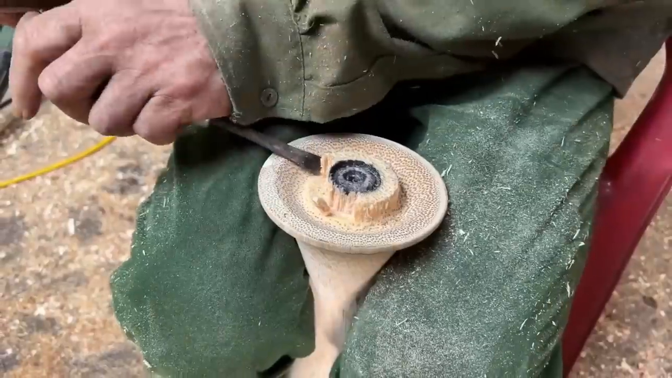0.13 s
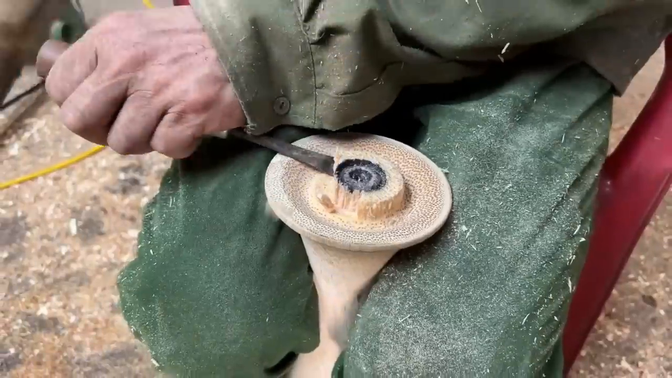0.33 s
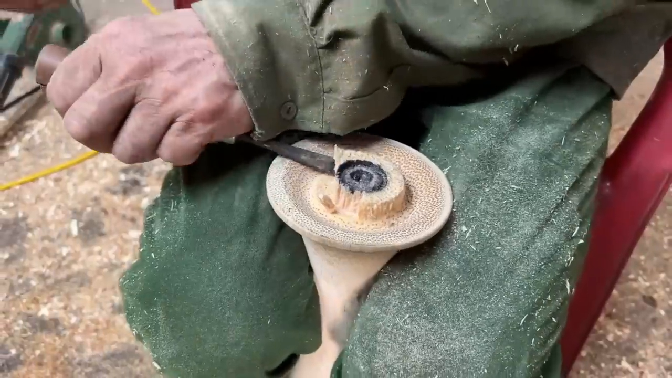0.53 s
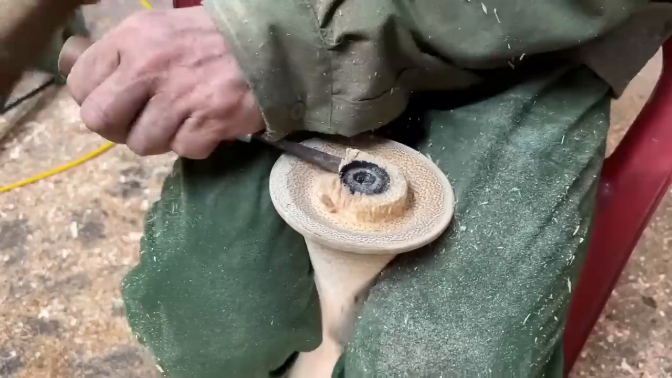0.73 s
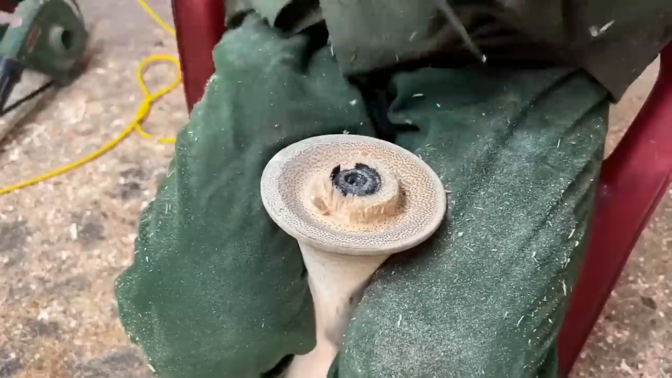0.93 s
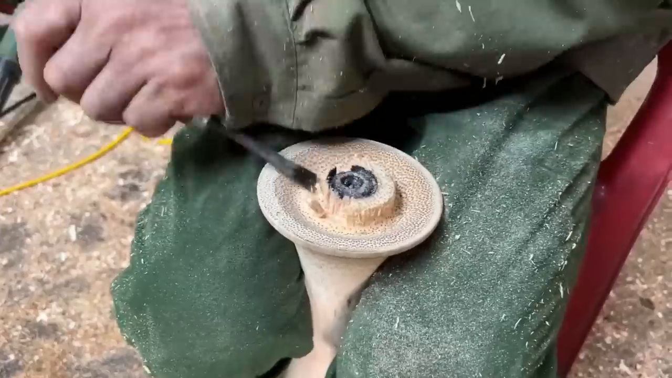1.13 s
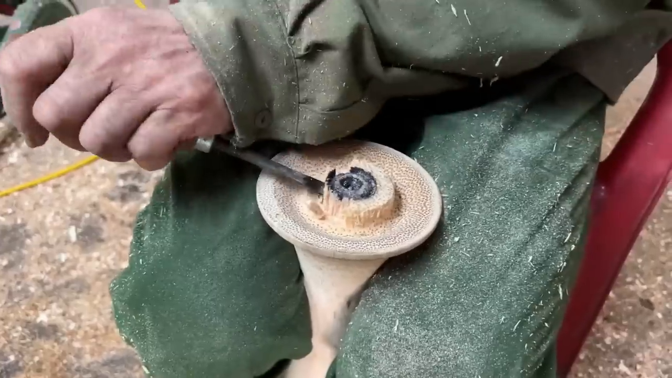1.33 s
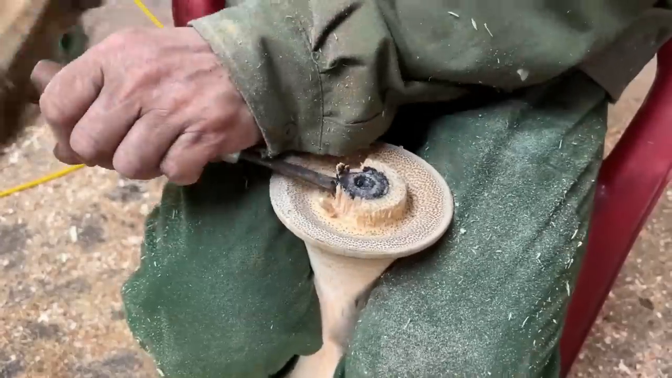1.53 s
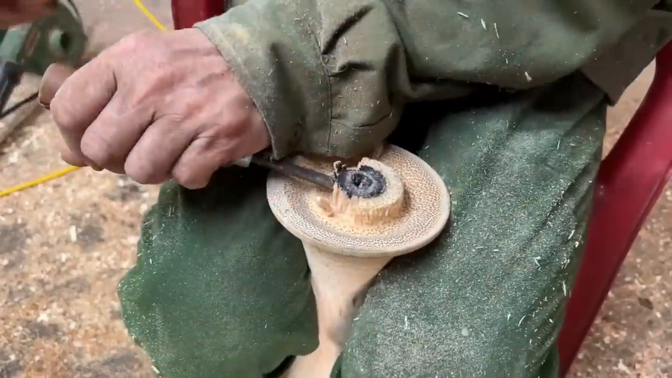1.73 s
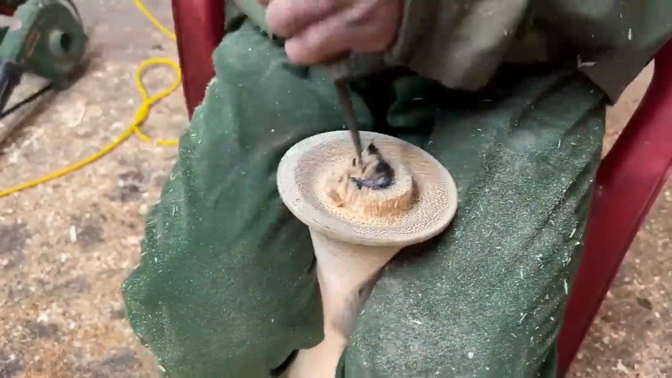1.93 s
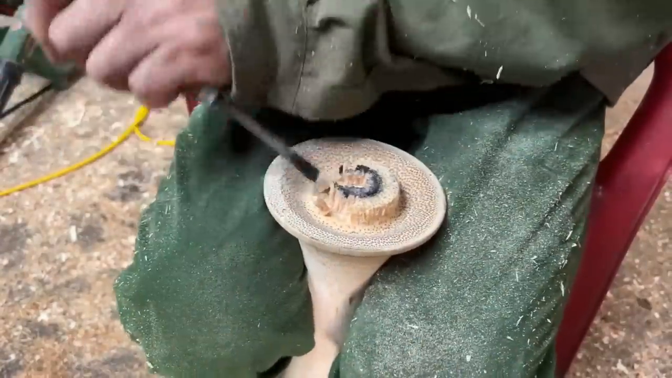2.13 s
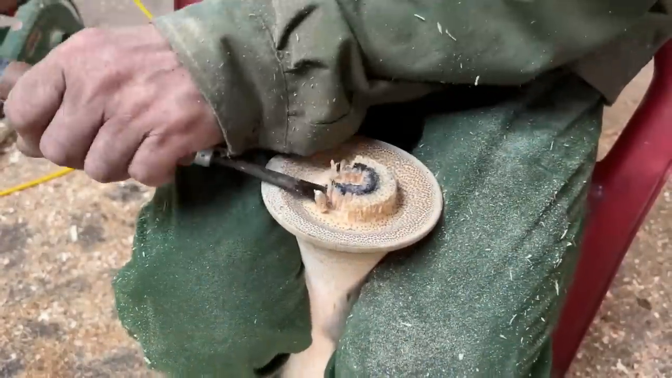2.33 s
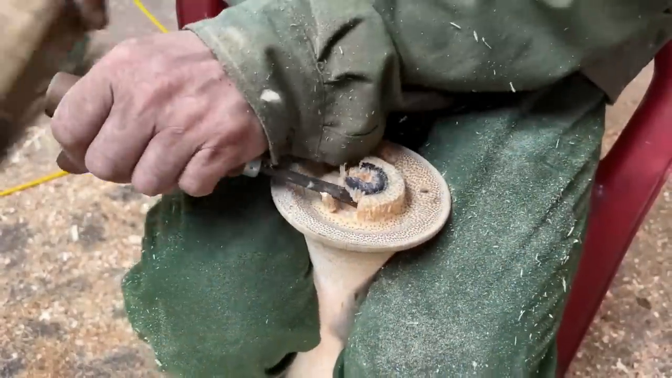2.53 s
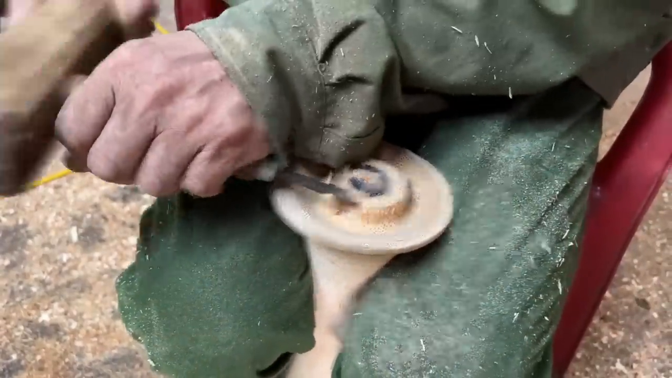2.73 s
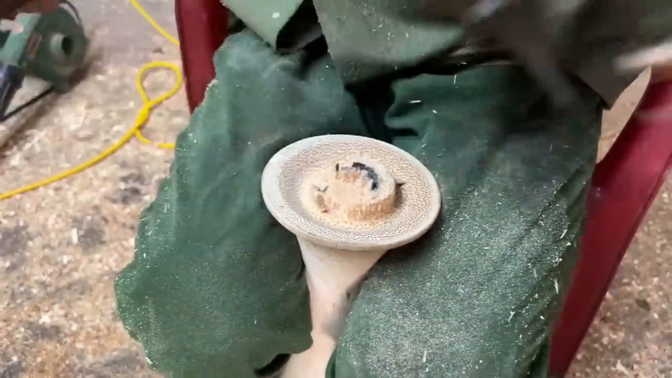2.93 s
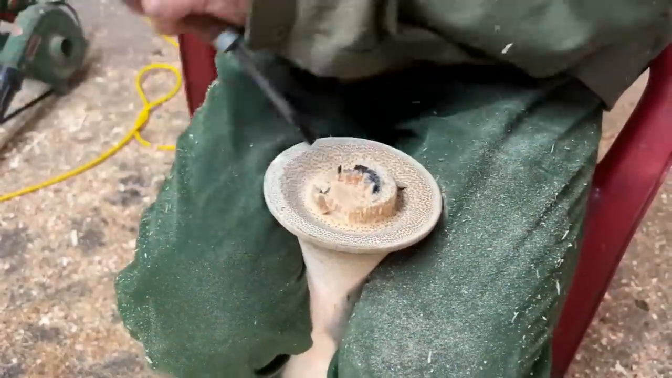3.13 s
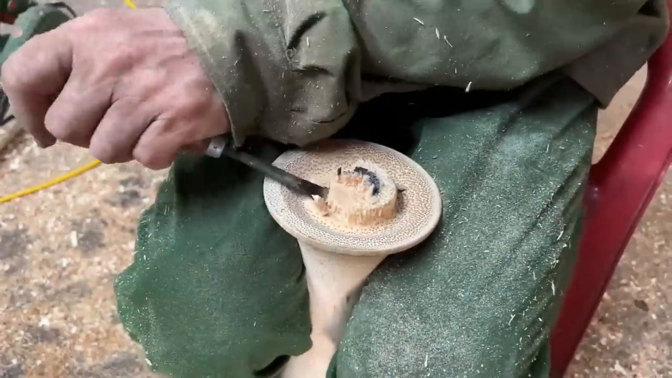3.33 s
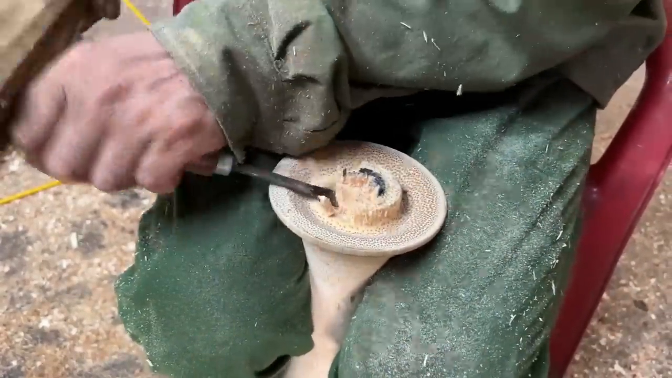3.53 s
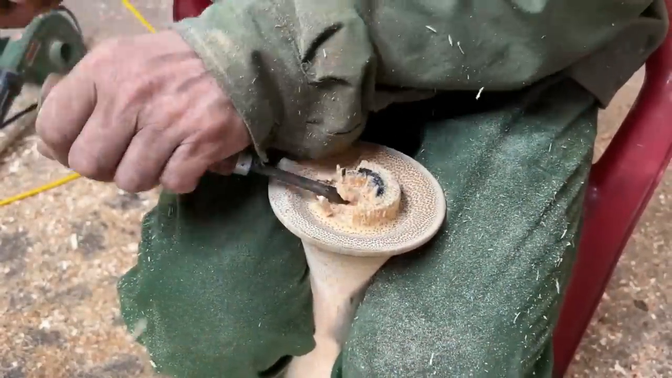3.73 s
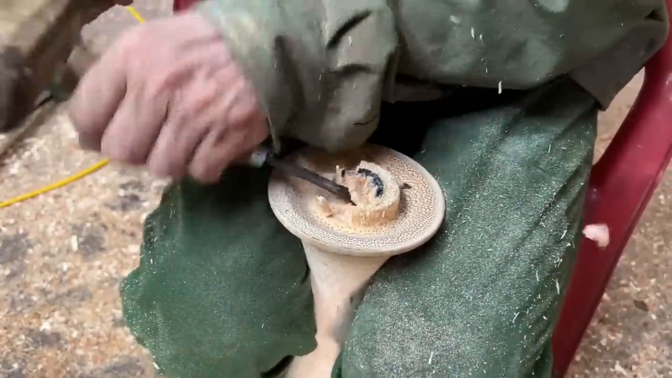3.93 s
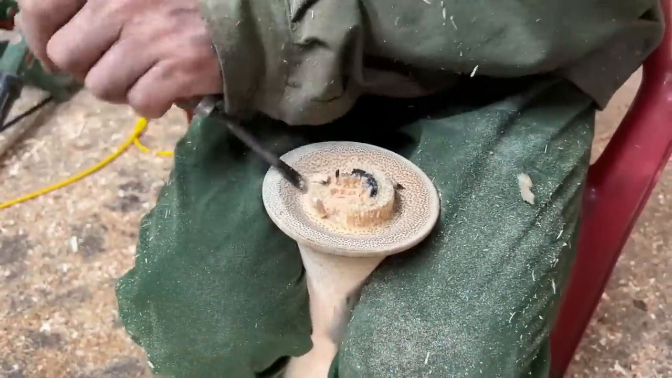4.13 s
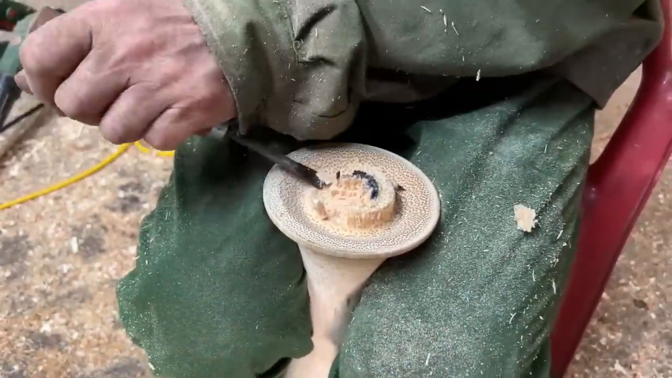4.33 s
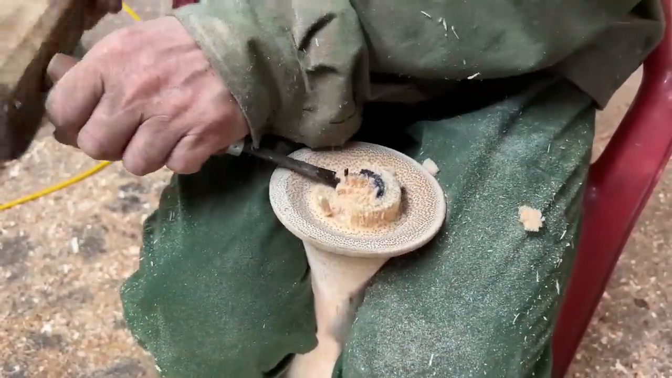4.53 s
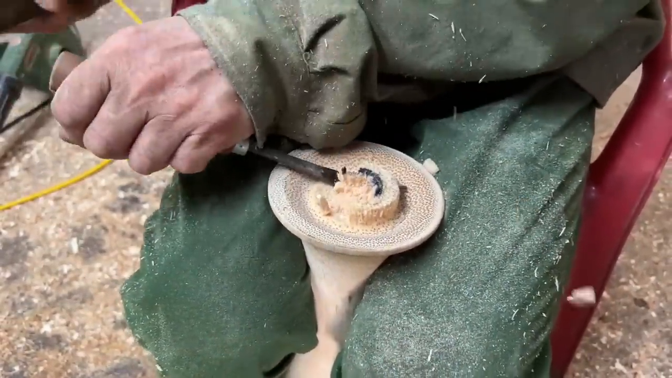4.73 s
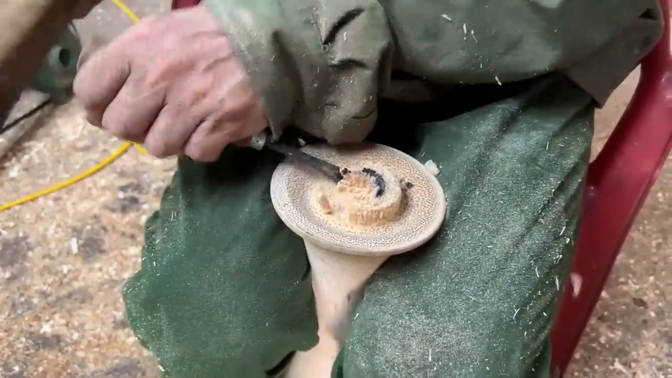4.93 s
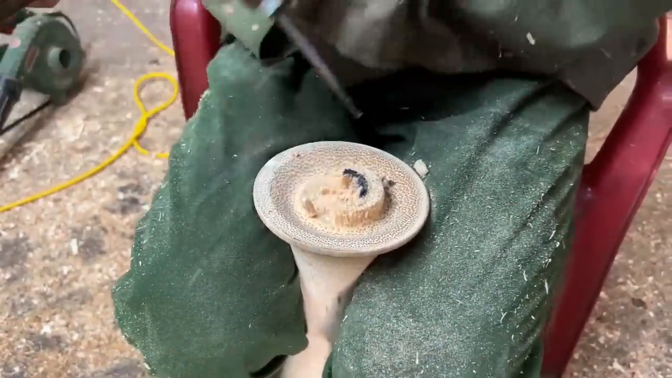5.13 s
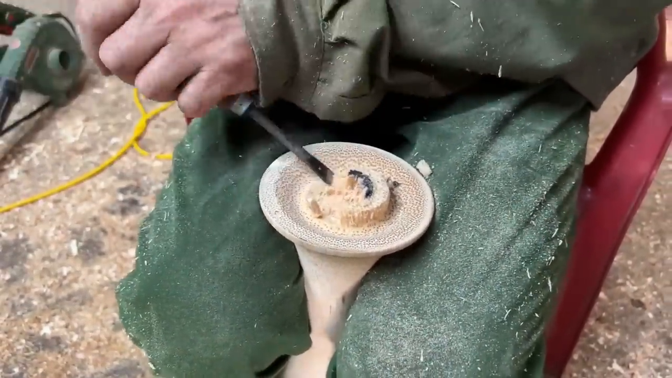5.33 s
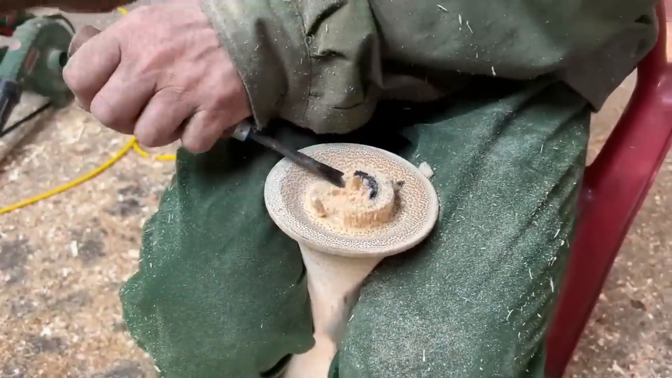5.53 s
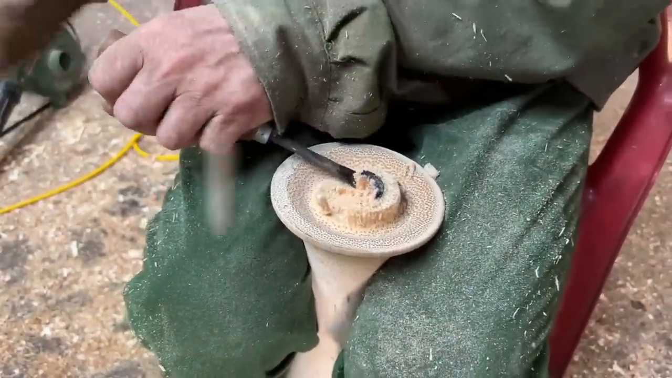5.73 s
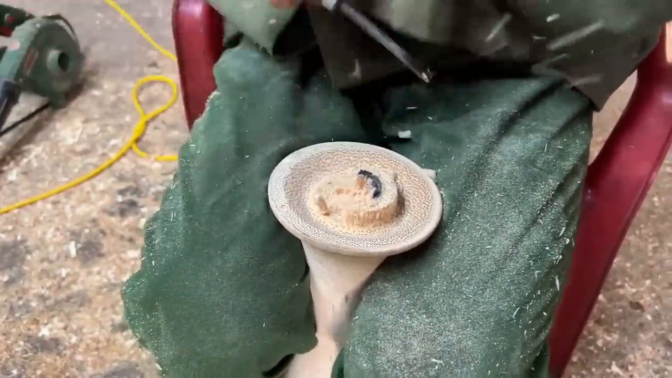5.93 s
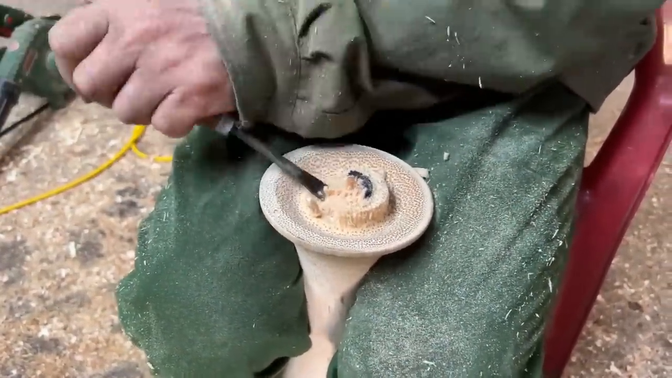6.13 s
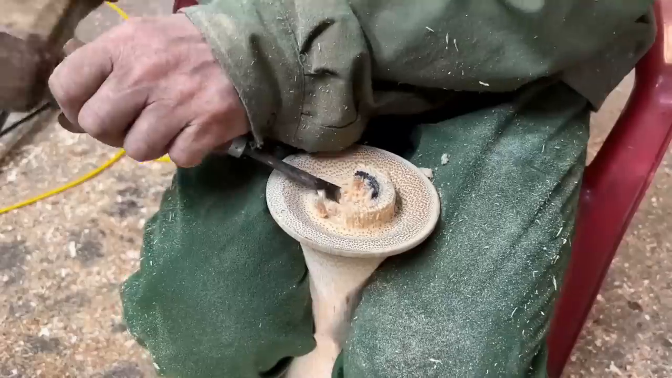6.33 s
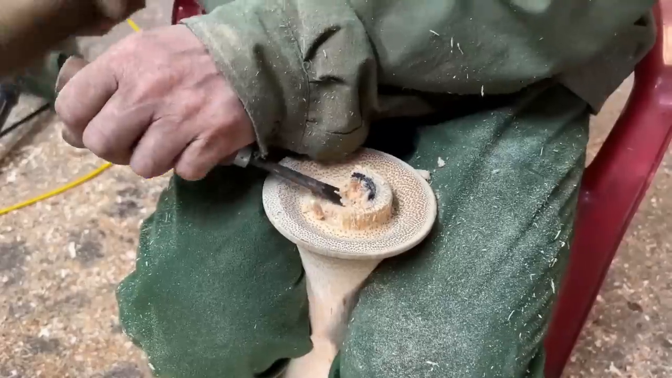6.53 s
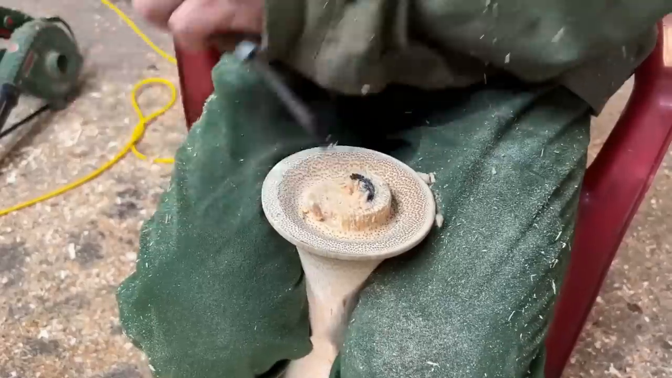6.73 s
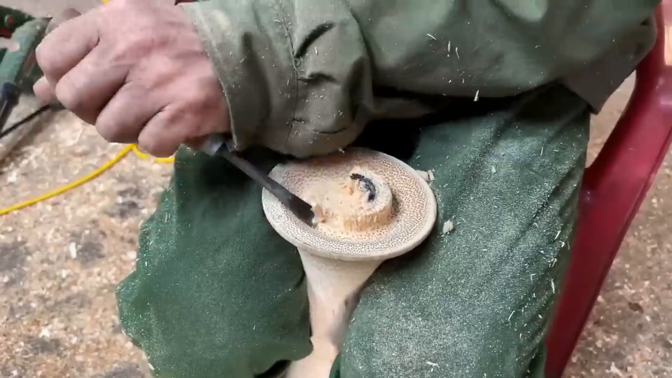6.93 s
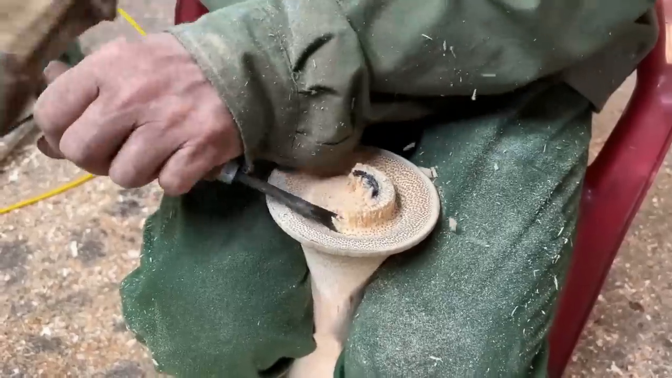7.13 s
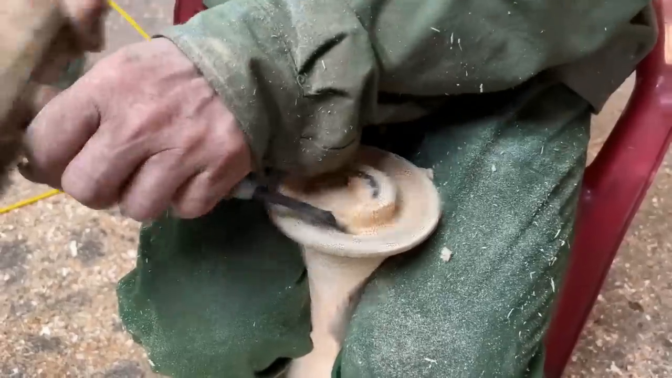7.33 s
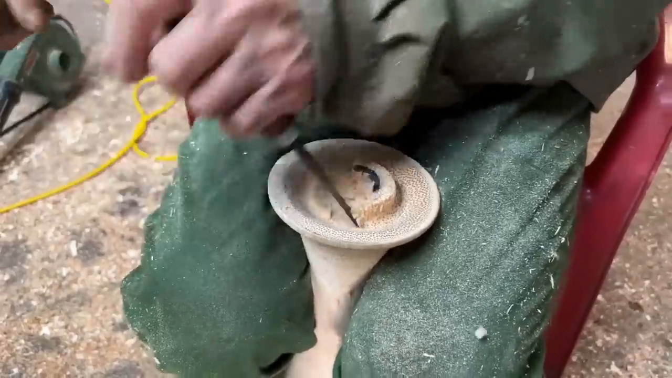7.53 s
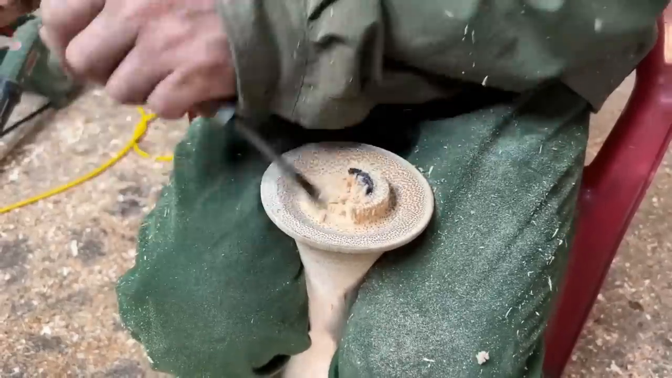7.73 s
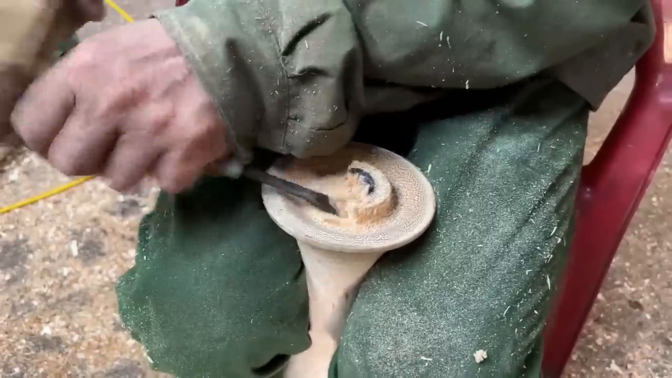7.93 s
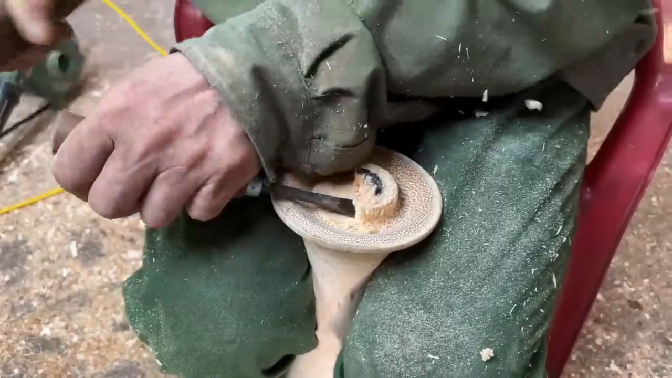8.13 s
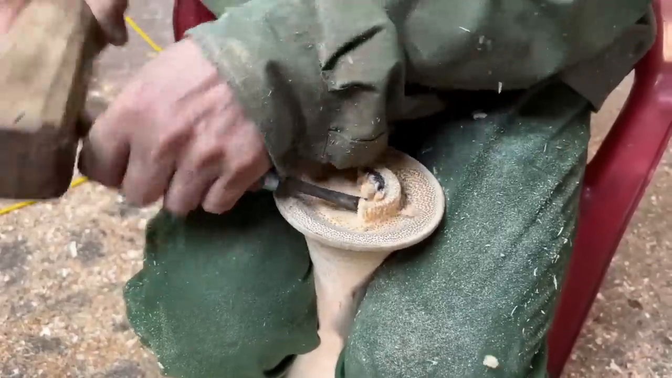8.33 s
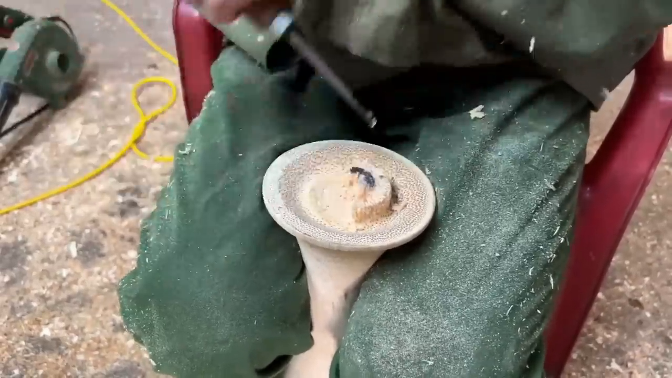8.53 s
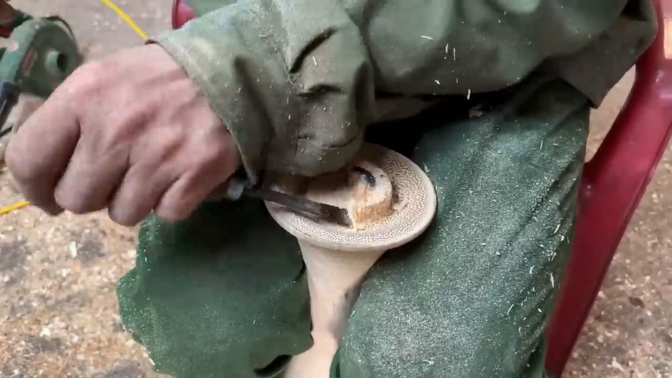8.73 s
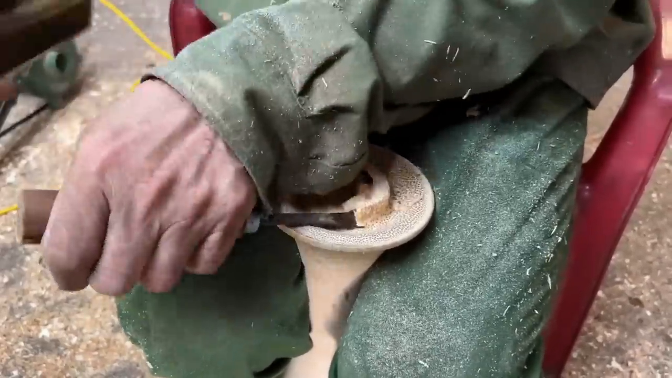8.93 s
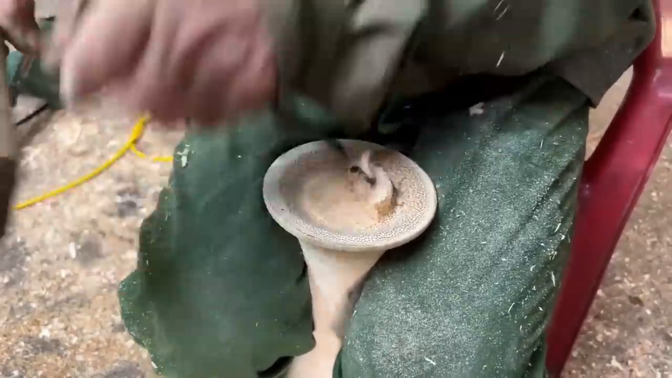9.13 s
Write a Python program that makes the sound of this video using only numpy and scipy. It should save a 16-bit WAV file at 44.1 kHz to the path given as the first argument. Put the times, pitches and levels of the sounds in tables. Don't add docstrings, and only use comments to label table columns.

```python
import sys
import numpy as np
from scipy import signal
from scipy.fft import irfft, next_fast_len
from scipy.io import wavfile
from scipy.ndimage import uniform_filter1d

SR = 44100
rng = np.random.default_rng(int(sys.argv[2]) if len(sys.argv) > 2 else 0)


def level_to_linear(level):
    exponent = np.asarray(level, float) / 20
    return 10 ** exponent


def wav_out(sig):
    wavfile.write(sys.argv[1], SR, np.round(np.clip(np.atleast_2d(sig).T, -1, 1) * 32767).astype(np.int16))


N = 409248

# freq_hz, level_db
AIR_SPECTRUM = [(15, -29), (25, -18), (92, -8.5), (158, -11.5), (228, -12.5), (288, -5), (328, -14),
                (437, -23), (485, -25), (538, -23.5), (1410, -25.5), (2250, -30), (5160, -41), (6190, -44),
                (12500, -53.5), (16200, -75.5), (22000, -120)]
# time_s, level_db
AIR_LEVEL = [(0.0, -55), (0.36, -52.5), (0.52, -58.5), (0.88, -56.5), (1.03, -63), (1.4, -64.5),
             (1.75, -58.5), (2.2, -63), (2.87, -62.5), (3.2, -66), (3.75, -66.5), (4.39, -65), (4.7, -59.5),
             (5.5, -65.5), (5.89, -56.5), (6.25, -63), (7.49, -59), (9.28, -62)]
# time_s, level_db
DRONE_LEVEL = [(0, -41.5), (.18, -47.5), (.3, -54.5), (.45, -73), (9.3, -80)]
# start_s, peak_db, pitch_hz, t60_s, left_right_db
TICKS = [(0.133, -43, 1630, 0.038, -2.5), (0.1334, -48, 2730, 0.026, 12), (0.1333, -48.5, 796, 0.022, 6),
         (.356, -36, 750, 0.034, -3.5), (0.3555, -46, 1500, 0.031, 2), (1.42, -65.5, 1400, 0.11, 4.5),
         (2.052, -45, 2000, 0.027, 1), (5.167, -54.5, 1600, .03, -3), (6.919, -45.5, 1610, 0.034, -8),
         (6.918, -57, 2830, 0.025, -6), (8.562, -45.5, 1600, 0.035, -3)]
# start_s, peak_db, pitch_hz, t60_s, left_right_db
CHIPS = [(.2, -59, 3700, .03, 5), (0.355, -48.5, 3500, 0.12, 1), (0.994, -56, 6900, 0.027, 0),
         (2.049, -43, 4360, 0.02, 5), (2.059, -51.5, 4200, 0.077, 3), (2.277, -65, 6250, 0.049, 4),
         (3.039, -63, 7000, 0.022, 5), (3.419, -70.5, 6030, 0.056, 3.5), (4.074, -55, 6950, 0.028, -1),
         (5.13, -58, 6000, 0.034, 6), (5.138, -52, 4500, 0.047, 4), (5.147, -51.5, 5530, 0.036, 9),
         (5.163, -54.5, 4010, .05, 2), (6.018, -57, 7450, 0.046, 1.5), (6.739, -47, 3920, 0.064, -1),
         (7.036, -67, 4700, 0.035, 11.5), (7.702, -41, 2930, 0.054, -1), (7.94, -66.5, 5000, 0.036, 0.5),
         (8.527, -56.5, 7000, 0.1, 2), (8.562, -48, 4040, 0.067, 2)]
# start_s, peak_db, pitch_hz, t60_s
BUMPS = [
    (0.35, -27, 277, 0.11),
    (.356, -27, 725, 0.09),
    (0.352, -30.5, 1515, 0.2),
    (0.36, -39, 105.5, 0.37),
    (2.065, -45, 330, 0.14),
    (3.59, -44, 70.4, 0.16),
    (5.2, -38, 85, 0.25),
    (8.574, -43, 250, 0.067),
    (17, -43, 35, .2),
    (9.06, -43, 45, .2),
]
# freq_hz, level_db
CRACK_SPECTRUM = [(240, -50), (400, -20), (1200, -6), (1850, 0.5), (3170, 0), (3840, -0.5), (4130, -6.5),
                  (4590, -12), (5000, -30.5), (6500, -49.5), (11000, -120)]
# freq_hz, level_db
TREBLE_SPECTRUM = [(3000, -31), (5000, 3), (7000, -0.5), (10000, -7), (13000, -10), (15500, -8.5),
                   (16800, -26)]
# freq_hz, level_db
THUD_SPECTRUM = [(30, -9), (100, 1), (270, 1), (500, -9), (900, -28)]
# freq_hz, level_db
LOW_WOOD_SPECTRUM = [(350, -15.5), (600, -10), (780, 2), (1050, -4.5), (1300, 3.5), (1600, -1.5),
                     (2500, -35)]
# freq_hz, level_db
WASH_SPECTRUM = [(1200, -18.5), (2100, 1), (2800, -4), (3800, -4.5), (4800, -16), (7000, -21.5),
                 (11000, -29.5), (16500, -47.5)]
# start_s, left_peak_db, right_peak_db, vase_ring_db, crack_hz
BLOWS = [(0.404, -23, -14, -35, 1864), (0.548, -13, -11, -35, 1710), (0.6772, -17, -13.5, -34, 1850),
         (0.8009, -12, -22, -36, 1860), (0.9208, -16, -21.5, -52, 2030),
         (1.6125, -17.5, -28, -37.5, 1640), (1.7461, -8, -17.5, -41, 2100),
         (1.874, -14, -19, -39.5, 1800), (2.4782, -19.5, -24, -43, 3320),
         (2.6099, -17, -17, -40, 2480), (2.7321, -18.5, -26.5, -44.5, 1960),
         (2.846, -33, -19.5, -45.5, 2020), (2.957, -23, -27.5, -50.5, 1500),
         (3.643, -10, -12, -39.5, 2200), (3.769, -27.5, -18, -46, 1750),
         (3.895, -16.5, -28, -47, 2170), (4.01, -20, -18.5, -36.5, 3900),
         (4.5114, -24, -19.5, -47, 2180), (4.6346, -22, -5, -48.5, 1750),
         (4.7557, -28, -12.5, -45, 1570), (4.8703, -15, -7.5, -40.5, 1440),
         (4.99, -13.5, -30.5, -45, 2450),
         (5.5366, -19, -23.5, -51, 1700), (5.6661, -4, -17, -40, 1730),
              (5.7927, -7.5, -24.5, -40, 2870), (5.9103, -20, -20.5, -39.5, 2204),
              (6.4128, -8.5, -25.5, -34, 2120), (6.5381, -14, -26, -36.5, 2300),
              (6.6578, -13.5, -14.5, -35.5, 1700), (7.0862, -18.5, -9.5, -33, 4050),
              (7.2172, -25, -18.5, -36, 1820), (7.3353, -17, -29, -45, 3200),
              (7.449, -10, -14.5, -38, 2840), (7.5706, -16, -18, -50, 2050), (8.0505, -1.5, -20, -35, 1850),
              (8.1816, -12, -27, -36, 1720), (8.3126, -23.5, -18.5, -38.5, 1775),
              (8.4293, -20.5, -20.5, -42.5, 4600), (8.9408, -10, -23.5, -34, 3720),
              (9.0645, -24, -21, -41, 1900), (9.187, -4.5, -26, -40.5, 4200)]
# upper_ring_db, low_wood_db, thud_db, steel_band_db, slower_decay_db_per_160ms
SEATS = [(-42, -42, -37, -3.5, 2.5), (-44, -43, -39, -6.5, 5), (-45, -46, -40, -5, 2.5),
         (-46, -48.5, -46.5, -3.5, -1), (-47.5, -45.5, -42.5, -5, 0), (-47, -44.5, -39.5, -8, -0.8),
         (-42, -46.5, -46.5, 8.5, -1), (-45.5, -45, -45, -6.5, 3), (-44, -46.5, -47.5, 0, 7.5),
         (-44.5, -47, -41.5, .3, 5)]
# vase_ring_hz, seated_upper_ring_hz, treble_db, purer_ring_db, lead_ms
SEAT_TONES = [(1765, 2600, -8, -14, 33), (1700, 2400, -10, -6.5, 24), (1800, 3020, -11.5, -13.5, 18.4),
              (1762, 4050, -8, 6, 25), (1700, 2400, -11, -3, 20), (1775, 2900, -10.5, -10, 24),
              (1750, 2500, -10, -13, 23), (1744, 3360, -11.5, -6, 20), (1775, 3650, -13, -7.5, 25),
              (1741, 2300, -10, -11, 19)]
# freq_hz, db_relative_to_frame
MASK = [(3000, -76), (6000, -60), (9000, -49), (12000, -46.5), (16000, -44)]

LENGTH, SHORT, LEAD = 11264, 5632, 2048
STEEL_TOP_HZ = 4050
TICK_SKIRT, CHIP_SKIRT, CHIP_WIDTH = .15, .5, .07
TICK_HISS_DB, CHIP_HISS_DB, HISS_DB_PER_OCTAVE = -26.5, -4, 10
PAUSE_S = .3
THUD_GROWS_DB, WOOD_GROWS_DB, UPPER_FADES_DB, DAMPS_DB = 7.5, 2, -1, -3.5
LEAD_GROWS_DB, LEAD_SHRINKS_MS, STEEL_FADES_DB, DULLS_DB = 5, -8.5, -2, -2.5
CRACK_WOOD_DB, CRACK_WOOD_GROWS_DB, CRACK_WOOD_SPREAD_DB = -17.5, 6.5, 3
LEAD_DB, LEAD_SPREAD_DB, LEAD_SPREAD_MS = -36.5, 1.5, 3
LAG_MS_PER_DB, LAG_SPREAD_MS_PER_DB = -0.01, 0.13
STEEL_DB_PER_OCTAVE = 1.5
UPPER_FOLLOWS = 0.14
RING_SPREAD_HZ, FREE_STEEL_HZ, SEATED_SPREAD_HZ = 22, 3850, 350


def evened(x):
    return x / np.sqrt(np.mean(x ** 2) + 1e-20)


def steadied(x, reach=200):
    return x / np.sqrt(np.mean(x[LEAD - reach // 2:LEAD + reach] ** 2))


def read(points, hz):
    f, value = np.transpose(points)
    return np.interp(np.log(hz + 1), np.log(f + 1), value)


def add(mix, s, sound):
    start = round(s * SR) - LEAD
    part = mix[start:start + len(sound)]
    part += sound[:len(part)]


def noise(gain, size=LENGTH):
    fast = next_fast_len(size)
    hz = np.fft.rfftfreq(fast, 1 / SR)
    bins = rng.standard_normal((len(hz), 2)).view(complex)[:, 0]
    return evened(irfft(gain(hz) * bins, fast)[:size])


def shaped(points):
    return lambda hz: level_to_linear(read(points, hz))


def peaked(centre_hz, width_hz):
    return lambda hz: 1 / (1 + ((hz - centre_hz) / width_hz) ** 2)


def lumps(hz, width_hz):
    hills = rng.standard_normal(256)
    return 3.5 * np.clip(np.interp(hz / width_hz, np.arange(256), hills), -2, 2)


def envelope(rise_s, t60_s, hold_s=0, size=LENGTH):
    t = (np.arange(size) - LEAD) / SR
    slope = np.minimum((t + hold_s) / rise_s, (hold_s - t) / t60_s)
    return level_to_linear(60 * np.minimum(slope, 0))


def workshop():
    t = np.arange(N) / SR
    sides = np.array([noise(shaped(AIR_SPECTRUM), size=N) for _ in range(2)])
    deep = noise(peaked(35, 30), size=N)
    wander = level_to_linear(1.3 * noise(peaked(0, 4.6), size=N))
    air = wander * sides + level_to_linear(-17.5) * wander ** 2 * deep
    tone = np.sin(2 * np.pi * 65 * t + rng.uniform(0, 6.7, (2, 1)))
    rough = 0.38 * noise(peaked(65, 11), size=N)
    drone = level_to_linear(np.interp(t, *np.transpose(DRONE_LEVEL))) * (tone + rough)
    return level_to_linear(np.interp(t, *np.transpose(AIR_LEVEL)) + 6.5) * air + drone


def snap(pitch_hz, t60_s, skirt, hiss_db):
    core, broad = peaked(pitch_hz, CHIP_WIDTH * pitch_hz), peaked(pitch_hz, .6 * pitch_hz)
    body = steadied(noise(lambda hz: core(hz) + skirt * broad(hz), size=SHORT))
    hiss = level_to_linear(hiss_db) * noise(shaped(TREBLE_SPECTRUM), size=SHORT)
    shape = envelope(.006, t60_s, 0.00099, size=SHORT)
    shape = shape + level_to_linear(-18.5) * envelope(0.12, 2 * t60_s, size=SHORT)
    return shape * (body + hiss)


def ticks_and_chips():
    out = np.zeros((2, N))
    snaps = [(*row, TICK_SKIRT, TICK_HISS_DB) for row in TICKS]
    for row in CHIPS:
        octaves = np.log2(row[2] / STEEL_TOP_HZ)
        snaps.append((*row, CHIP_SKIRT, CHIP_HISS_DB + HISS_DB_PER_OCTAVE * octaves))
    for s, peak_db, pitch_hz, t60_s, pan_db, skirt, hiss_db in snaps:
        for side in (0, 1):
            level = level_to_linear(peak_db + (.5 - side) * pan_db)
            add(out[side], s, level * snap(pitch_hz, t60_s, skirt, hiss_db))
    return out


def bumps():
    out = np.zeros((2, N))
    for s, peak_db, pitch_hz, t60_s in BUMPS:
        for side in (0, 1):
            body = steadied(noise(peaked(pitch_hz, 0.29 * pitch_hz)), round(SR / pitch_hz) + 200)
            add(out[side], s, level_to_linear(peak_db) * envelope(1.96 / pitch_hz + 0.012, t60_s) * body)
    return out


def crack(peak_db, treble_db, thud_db, mean_db, crack_hz, low_db, steel_db, early_ms, lead_db):
    smear = level_to_linear(-17 - peak_db)
    shape = envelope(0.0046 * smear, 0.022 * smear, 0.00052 * smear, size=SHORT)
    shape = shape + level_to_linear(-16.5) * envelope(0.0027, 0.087, size=SHORT)
    wood, steel, favoured = peaked(540, 410), peaked(4100, 500), peaked(crack_hz, 330)

    def body_gain(hz):
        resonances_db = (low_db + 18) * wood(hz) + (steel_db + 7) * steel(hz) + 8 * favoured(hz)
        return level_to_linear(read(CRACK_SPECTRUM, hz) + resonances_db + .7 * lumps(hz, 251))

    body = noise(body_gain, size=SHORT)
    body /= np.sqrt(np.mean(body[LEAD - 60:LEAD + 100] ** 2))
    bright = noise(lambda hz: level_to_linear(read(TREBLE_SPECTRUM, hz) + lumps(hz, 400)), size=SHORT)
    bright = level_to_linear(treble_db) * bright
    early = envelope(0.0056, .01, early_ms / 1000, size=SHORT) * envelope(0.12, 0.0033, size=SHORT)
    lead = early * level_to_linear(mean_db + lead_db) * (level_to_linear(-8) * body + level_to_linear(3.5) * bright)
    thud = envelope(0.027, 0.083, size=SHORT) * noise(shaped(THUD_SPECTRUM), size=SHORT)
    thud = level_to_linear(mean_db + thud_db + 2) * thud
    blurred = uniform_filter1d(shape, 60) * 1.013
    return level_to_linear(peak_db) * (shape * body + blurred * bright) + lead + thud


def ring(ring_hz, ring_db, upper_hz, upper_db, low_db, slower_db, purer_db):
    t = (np.arange(LENGTH) - LEAD) / SR
    bend_db = slower_db * np.clip(t - .045, -.05, .07) / 0.16
    bend_db = bend_db - 60 * np.maximum(t - .11, 0)
    flutter = level_to_linear(2.8 * np.clip(noise(peaked(0, 34)), -3, 1.8))
    purity = level_to_linear(1.2 * (ring_db - upper_db - 6) + purer_db)
    skirt, core = peaked(ring_hz, 120), peaked(ring_hz, 36)
    main = level_to_linear(ring_db + 8.5) * noise(lambda hz: skirt(hz) + purity * core(hz))
    low = level_to_linear(low_db + 9) * noise(lambda hz: level_to_linear(read(LOW_WOOD_SPECTRUM, hz) + lumps(hz, 90)))
    upper = level_to_linear(upper_db) * noise(peaked(min(upper_hz, STEEL_TOP_HZ), 130))
    wash = level_to_linear(upper_db + 12) * noise(lambda hz: level_to_linear(read(WASH_SPECTRUM, hz) + 1.4 * lumps(hz, 75)))
    tail = envelope(0.03, 0.31) * flutter * main
    tail = tail + envelope(.02, 0.33) * low
    tail = tail + envelope(.012, 0.3) * flutter * upper
    tail = tail + envelope(0.013, 0.28) * flutter[::-1] ** 1.1 * wash
    return level_to_linear(bend_db) * tail * signal.windows.tukey(LENGTH, .2)


def chisel():
    out, blows = np.zeros((2, N)), np.array(BLOWS)
    group = np.cumsum(np.diff(blows[:, 0], prepend=blows[0, 0]) > PAUSE_S)
    chance = np.clip(rng.standard_normal((len(blows), 6)), -2, 2)
    for (s, left_db, right_db, ring_db, crack_hz), g, luck in zip(blows, group, chance):
        upper_db, low_db, thud_db, steel_db, slower_db = SEATS[g]
        ring_hz, seated_hz, treble_db, purer_db, lead_ms = SEAT_TONES[g]
        mates = blows[group == g]
        depth = (s - mates[0, 0]) / (mates[-1, 0] - mates[0, 0])
        mid = depth - .5
        mean_db, top_db = (left_db + right_db) / 2, max(left_db, right_db)
        lag_s_per_db = (LAG_MS_PER_DB + LAG_SPREAD_MS_PER_DB * luck[0]) / 1000

        treble_db += DULLS_DB * depth ** 3
        thud_db += THUD_GROWS_DB * mid - mean_db
        wood_db = CRACK_WOOD_DB + CRACK_WOOD_GROWS_DB * depth + CRACK_WOOD_SPREAD_DB * luck[1]
        steel_db += STEEL_FADES_DB * mid
        steel_db += STEEL_DB_PER_OCTAVE * np.log2(crack_hz / mates[:, 4].mean())
        lead_ms = max(lead_ms + LEAD_SHRINKS_MS * mid + LEAD_SPREAD_MS * luck[2], 6)
        lead_db = LEAD_DB + LEAD_GROWS_DB * mid + LEAD_SPREAD_DB * luck[3] - mean_db

        upper_hz = seated_hz + SEATED_SPREAD_HZ * luck[4] if depth else FREE_STEEL_HZ
        upper_db += UPPER_FADES_DB * mid + UPPER_FOLLOWS * (ring_db - mates[:, 3].mean())
        ring_hz += RING_SPREAD_HZ * luck[5]
        low_db += WOOD_GROWS_DB * mid
        slower_db += DAMPS_DB * mid
        for side, peak_db in enumerate((left_db, right_db)):
            at_s = s + lag_s_per_db * (top_db - peak_db)
            add(out[side], at_s, crack(peak_db, treble_db, thud_db, mean_db, crack_hz, wood_db,
                                       steel_db, lead_ms, lead_db))
            add(out[side], at_s, ring(ring_hz, ring_db, upper_hz, upper_db, low_db, slower_db, purer_db))
    return out


def scene():
    return chisel() + ticks_and_chips() + bumps() + workshop()


def thinned(x):
    hz, _, z = signal.stft(x, SR, nperseg=1024)
    frame_db = 10 * np.log10((abs(z) ** 2).sum(1, keepdims=True) + 1e-12)
    bands_db = 4 * np.repeat(rng.standard_normal((2, 33, z.shape[2])), 16, axis=1)[:, :len(hz)]
    limit = level_to_linear(frame_db + read(MASK, hz)[:, None] + bands_db)
    return signal.istft(z * (abs(z) > limit), SR, nperseg=1024)[1][:, :N]


def top_cut(x):
    return signal.sosfilt(signal.butter(12, 16800, fs=SR, output="sos"), x)


def record(dry):
    soft = .8 * np.tanh(dry / .8)
    lowpass = signal.firwin(255, 16300, window=("kaiser", 8), fs=SR)
    limited = signal.oaconvolve(thinned(soft), lowpass[None], "same")
    return top_cut(limited)


dry = scene()
out = record(dry)
wav_out(out)
```